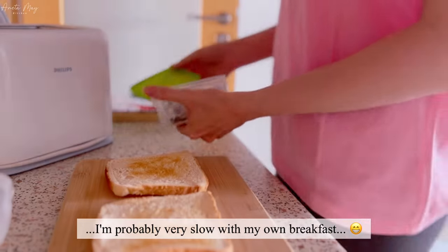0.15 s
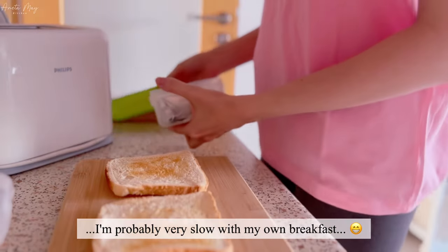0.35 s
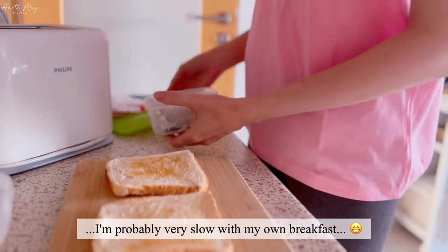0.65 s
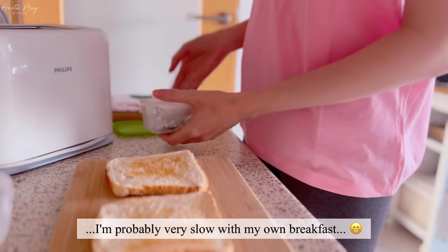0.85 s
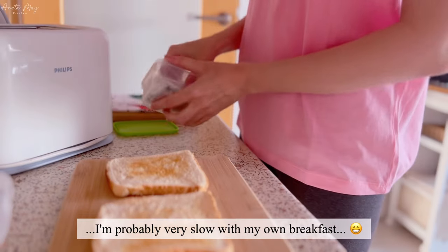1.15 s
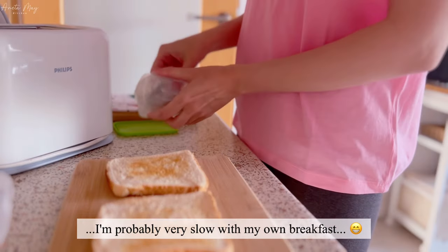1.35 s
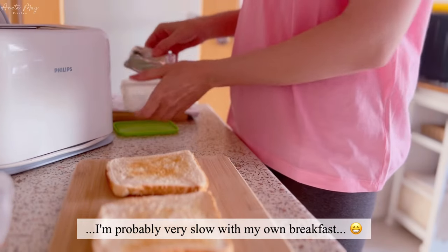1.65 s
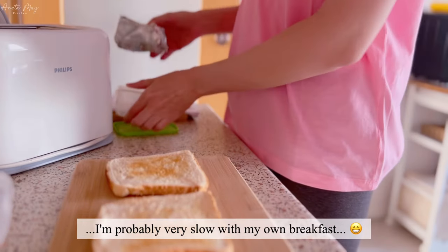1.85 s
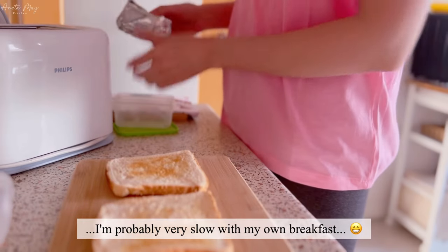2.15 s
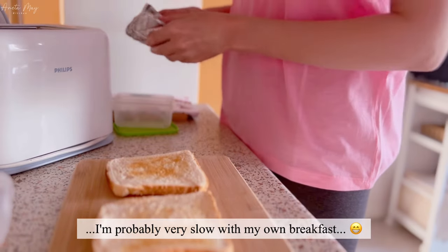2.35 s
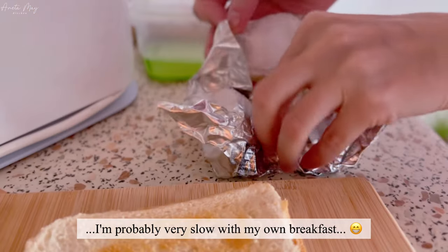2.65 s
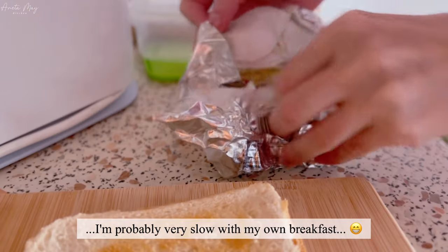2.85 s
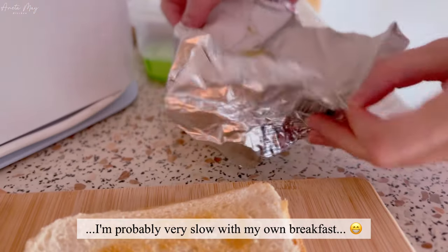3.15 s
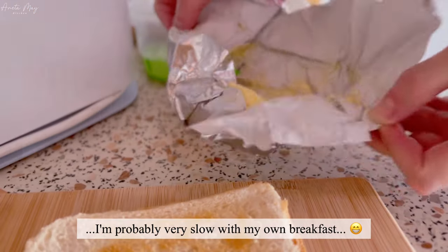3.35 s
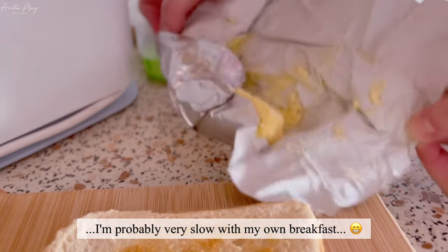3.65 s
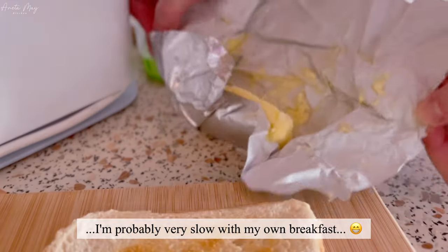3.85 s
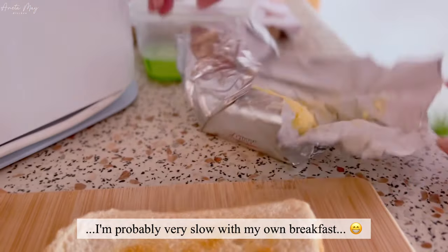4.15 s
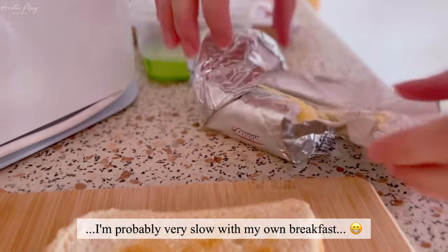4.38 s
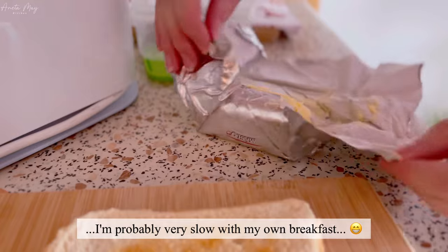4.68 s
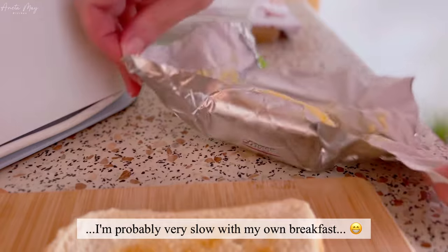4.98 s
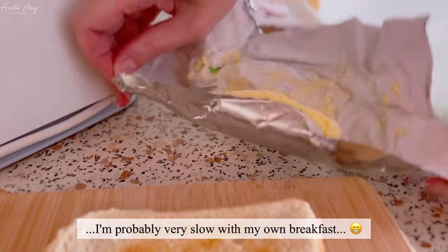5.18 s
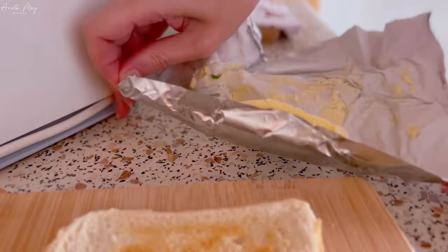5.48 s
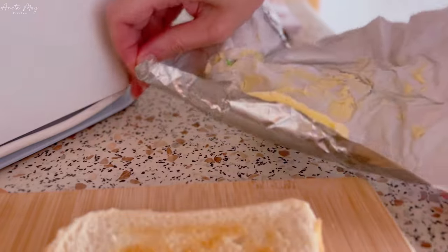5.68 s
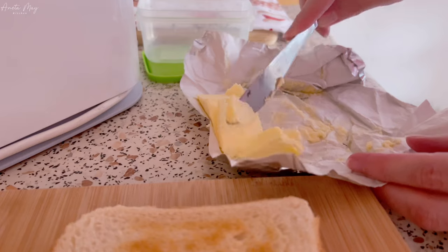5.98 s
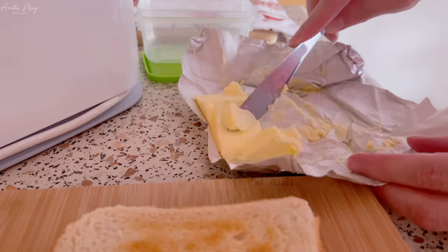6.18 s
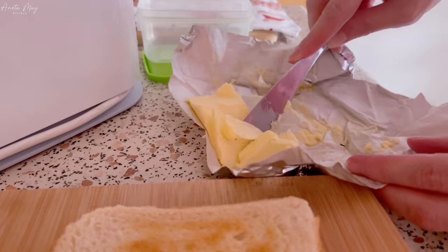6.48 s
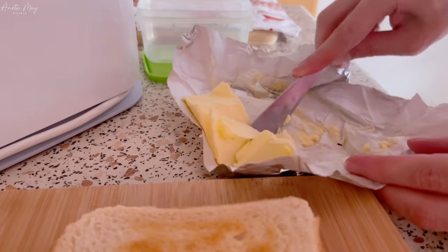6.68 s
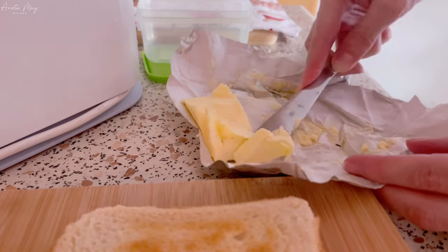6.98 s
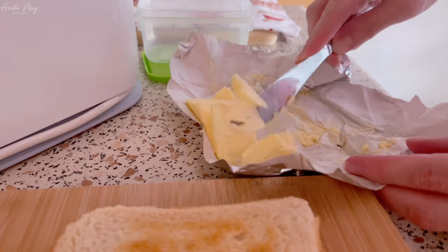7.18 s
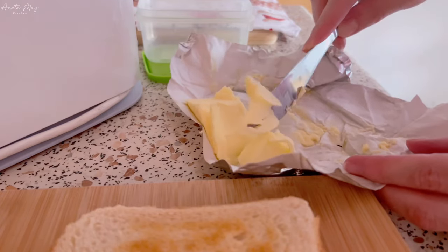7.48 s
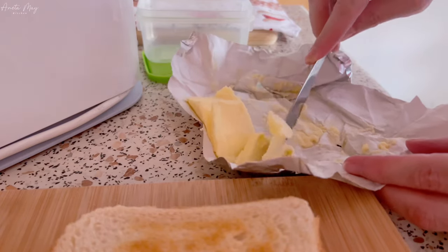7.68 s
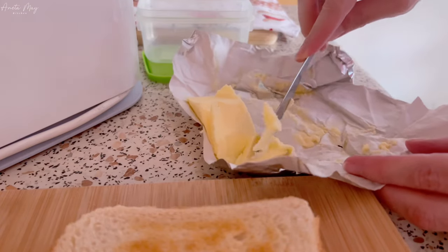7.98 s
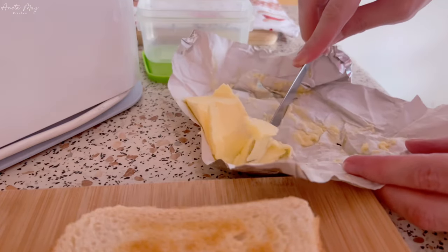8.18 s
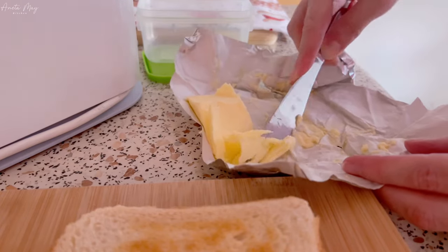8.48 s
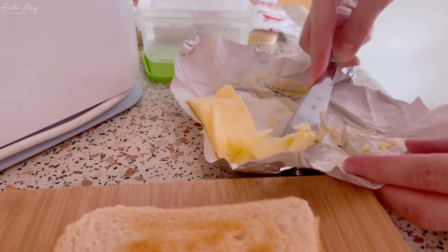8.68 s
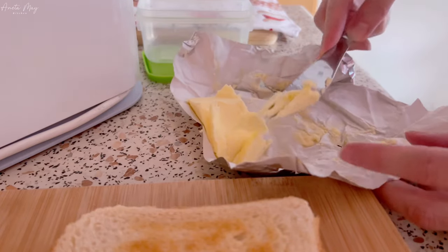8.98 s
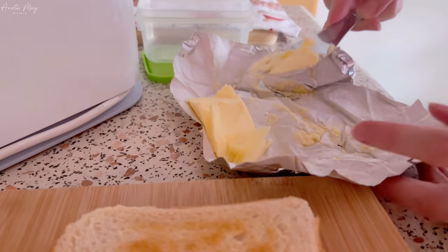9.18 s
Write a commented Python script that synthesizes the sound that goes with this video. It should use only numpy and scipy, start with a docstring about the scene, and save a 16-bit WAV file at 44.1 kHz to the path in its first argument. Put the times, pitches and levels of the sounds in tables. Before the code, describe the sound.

Close stereo microphones in a small, hard kitchen. A thin plastic container and its lid knock in a few hollow clacks, loudest near two seconds. Then foil butter wrapping is peeled open with bright snaps and dense crinkle, strongest just after three seconds. It thins to small crackles and faint rustles as a knife nudges the butter, with soft counter bumps and a faint steady hush beneath.

```python
"""A plastic tub and its lid knock on a stone counter in a quiet kitchen, over a faint steady hush.
Then a foil butter wrapper is peeled open with sharp snaps and rustle, and a knife works the butter.
Knocks are struck plastic resonances, snaps are noise bursts ringing at a crease pitch, rustle is
thousands of tiny clicks; soft bumps and low rumble come from the counter. Random echoes make a small
hard room, and a pair of microphone ports listens from close by."""
import sys
import numpy as np
from scipy import signal
from scipy.fft import rfft, irfft, next_fast_len
from scipy.io import wavfile
from scipy.ndimage import uniform_filter1d

SR = 44100
rng = np.random.default_rng(int(sys.argv[2]) if len(sys.argv) > 2 else 0)


def master(y):
    """Save y as 16-bit WAV."""
    cut = np.clip(np.atleast_2d(y).T, -1, 1)
    pcm = np.round(cut * 32767)  # scale
    wavfile.write(sys.argv[1], SR, pcm.astype(np.int16))


N = 411453

# The quiet kitchen's noise colour: pitch_hz, level_db (per Hz, relative)
HUSH_COLOUR = [(18, -21.5), (30, 6), (72, 4.5), (280, -10.5), (680, -21), (1270, -13.5), (1900, -20),
               (2400, -23.5), (8000, -30.5), (12000, -37), (16500, -49.5)]
# How alike the hush is at both ports: pitch_hz, likeness (0 to 1)
HUSH_LIKENESS = [(100, 0.92), (600, 0.27), (3000, 0.084)]
HUSH_DB = -69

# Shoves that set the counter rumbling: peak_s, level_db
SHOVES = [(0.0, -59), (0.17, -65), (0.47, -61), (0.83, -52), (1.87, -55.5), (2.0, -45.5), (2.08, -50),
          (2.49, -53.5), (2.96, -62.5), (3.3, -46), (3.57, -40.5), (3.709, -44.5), (3.998, -42.5),
          (4.24, -57), (4.5, -53), (4.62, -60.5), (4.86, -55.5), (5.3, -65.5), (5.6, -66.5), (5.76, -55.5),
          (5.93, -53.5), (6.2, -70), (6.7, -57.5), (6.86, -57), (7.12, -49.5), (7.6, -70), (7.799, -57),
          (8.47, -60), (8.65, -68.5), (9.25, -68)]
# Colour of that rumble: pitch_hz, level_db (per Hz, relative)
RUMBLE_COLOUR = [(20, -41.5), (45, 8.5), (90, 6.5), (160, 5), (260, -8), (450, -45.5)]
SHOVE_RISE_DB_PER_S, SHOVE_FALL_DB_PER_S = 301, 134

# Lid and tub knocks: start_s, blow_db, edge_tick_db (over the blow), pitch_hz, left_over_right_db
KNOCKS = [(0.004, -40, -30, 546, 0), (0.071, -53, -13, 1080, 0), (0.189, -49, -8.5, 848, 5.5),
          (0.235, -53, -21, 1250, -1), (0.464, -28.5, 3.5, 1200, 7), (0.507, -30.5, -11, 1236, 0.5),
          (0.809, -23.5, -2, 1090, -2), (0.815, -26, 1, 1130, 15), (0.853, -28.5, -15, 1180, -5),
          (0.868, -38.5, 4.5, 569, 23.5), (0.884, -32, -24, 1325, -8), (1.128, -42, -31, 1060, -0.5),
          (1.165, -42.5, -31, 625, 1), (1.197, -46, -30, 641, 1), (1.219, -41.5, -35, 1030, -2),
          (1.241, -42, -20, 1090, 1.5), (1.335, -43, -14, 1200, -1), (1.359, -39.5, -23, 1200, 0),
          (1.377, -41.5, -3, 1060, 10), (1.391, -40, -8, 1030, 2.0), (1.444, -54.5, 5.5, 960, 5.5),
          (1.47, -48.5, -20, 939, 0), (1.597, -39.5, 2.5, 890, 3), (1.855, -18.5, -6.5, 1390, 3.5),
          (1.883, -24, -12, 890, 9), (1.996, -17.5, -8, 1010, 8), (2.022, -43, -27, 1026, -6),
          (2.055, -17, -15.5, 1080, 8), (2.119, -28.5, -86, 1170, 2.5)]
# What the plastic rings with: pitch_hz, level_db, t60_s (time to fade by 60 dB)
PLASTIC_MODES = [(480, -14, 0.01), (610, 12.5, .03), (620, 3, 0.011), (794, 13.5, .03), (854.6, 2.5, 0.17),
                 (971, 10, 0.041), (1080, 9.5, 0.024), (1183, 2.5, .06), (1328, 2, 0.032),
                 (1490, -11, 0.038), (1650, -19.5, 0.015), (1930, -12.5, 0.019), (2750, -10, 0.07)]

# Strokes of fingers and knife over plastic and foil: peak_s, swell_s, fade_s, rustle_db,
# fold_pitch_hz, sizzle_db (over the rustle), body_db (over the rustle)
STROKES = [(0.004, .01, 0.075, -67.5, 1037, -10, 19), (0.23, 0.45, 0.045, -73.5, 1320, -10, 3.5),
           (0.796, 0.0045, .005, -75, 2000, -24, -24), (0.879, 0.085, 0.14, -49, 1590, -19, -4.5),
           (1.332, 0.071, 0.073, -56, 1244, -6.5, -38), (1.4, 0.068, 0.017, -57.5, 1147, 7.5, -36),
           (1.603, 0.036, 0.088, -56.5, 2110, -7, -2.5), (2.33, 0.073, .1, -59.5, 1768, -3.5, -2.5),
           (2.464, 0.026, 0.081, -56.5, 1672, -2, 4), (2.67, 0.064, 0.027, -51.5, 1594, -7, -18),
           (2.8, 0.17, 0.23, -55.5, 1298, -7.5, 1.5), (3.212, 0.069, 0.12, -50.5, 2400, -38, -5),
           (3.288, 0.086, 0.013, -50, 2263, -15.5, -2), (3.527, 0.12, 0.054, -52.5, 1937, 0, -0.5),
           (3.61, 0.011, 0.032, -47.5, 2014, 5.5, 1), (3.72, 0.09, 0.12, -53.5, 2180, -2, 1),
           (3.958, 0.075, .04, -59.5, 1932, -3.5, -6), (4.061, 0.013, 0.033, -59, 1688, 1, -2),
           (4.542, 0.038, 0.1, -57.5, 1580, 0.5, -0.5), (4.701, 0.0067, 0.17, -64.5, 1872, -3, -2.5),
           (4.91, 0.09, 0.37, -67, 2130, -16, 3), (5.07, 0.14, 0.16, -67.5, 1440, -2.5, -2),
           (5.382, 0.034, 0.14, -63.5, 1850, -46, 10), (5.58, 0.048, 0.089, -62.5, 2050, -27.5, 3),
           (5.689, 0.021, 0.023, -67.5, 1480, -5, -11), (5.799, 0.022, 0.054, -68, 2100, 8, 4.5),
           (5.859, 0.03, 0.05, -54, 2025, -4, -4), (5.94, 0.028, 0.09, -68.5, 1913, -10, 7),
           (6.325, 0.016, 0.12, -69.5, 1510, -7.5, 0.5), (6.692, 0.11, 0.092, -58, 1670, -10.5, -4.5),
           (6.854, 0.014, 0.066, -45, 1782, -7.5, -1.5), (6.894, 0.017, 0.013, -52.5, 1830, -9.5, -2),
           (7.028, 0.032, 0.22, -54.5, 1910, -9, -4), (7.201, 0.022, 0.027, -65, 1902, -13, 0),
           (7.601, 0.019, .06, -65, 1543, -6.5, 0), (7.717, 0.016, 0.072, -66.5, 2182, -10, -2),
           (7.922, 0.053, 0.042, -64.5, 1733, -5.5, -8.5), (8.375, .004, 0.038, -62, 2200, -2.5, -2),
           (8.402, .01, .01, -55.5, 1990, -5, -3), (8.44, 0.0084, 0.016, -55, 1901, -7.5, -4),
           (8.522, 0.047, 0.028, -49.5, 1870, -11, -7.5), (8.642, 0.096, 0.051, -61.5, 1560, -6, -2.5),
           (8.78, .005, 0.14, -79, 1600, -8.5, -9.5), (8.959, .005, 0.057, -73.5, 1990, -2.5, -5),
           (9.043, .005, .04, -69.5, 2100, -4.5, -5)]
STROKE_HOLD_S = 0.015  # flat top on either side of the peak
STROKE_DEPTH_DB = 18  # drop from the flat top, one swell before it and one fade after it
# Colours of large folds, small folds and the finest crinkles: pitch_hz, level_db (per Hz, relative)
BODY_COLOUR = [(250, -3.5), (400, 0.5), (700, 3), (1100, 3), (1600, -14), (3000, -60.5)]
CRACK_COLOUR = [(600, -20), (1200, -13), (2200, 3.5), (3500, 1), (5500, -2), (8000, -34.5)]
SIZZLE_COLOUR = [(4000, -45), (6000, 6), (8000, 2), (11000, -4), (13500, -7), (15700, -1.5), (16400, -20)]
OVERTONE, OVERTONE_SHARE = 1.55, 0.42  # second ring of a crease: pitch ratio and strength

# The butter block and the hands bump the counter: start_s, level_db, pitch_hz, t60_s
BUMPS = [(0.463, -31, 638, 0.051), (0.81, -33.5, 627, 0.08), (1.851, -36.5, 151, 0.21),
         (1.994, -26.5, 640, 0.047), (2.056, -29, 520, 0.027), (2.363, -46, 532, 0.052),
         (2.476, -39, 71, 0.085), (3.278, -34.5, 565, 0.081), (3.56, -47, 86, 0.12),
         (3.683, -29.5, 84, 0.17), (3.991, -28.5, 117, 0.11), (4.046, -53, 80.7, 0.076),
         (4.167, -46.5, 154, 0.16), (4.496, -44, 318, 0.1), (4.602, -45.5, 353, 0.084),
         (4.833, -50, 138, 0.13), (5.743, -49.5, 99, 0.12), (5.808, -51, 65.2, 0.048),
         (5.9, -45.5, 163, 0.17), (6.087, -55, 93, 0.11), (6.688, -46, 338, 0.12),
         (6.835, -35.5, 607, 0.11), (7.004, -42.5, 273, 0.1), (7.107, -31.5, 351, 0.056),
         (7.6, -56.5, 300, 0.17), (7.788, -44, 265, 0.099), (8.266, -50.5, 380, 0.11),
         (9.158, -57, 328, 0.13)]
# Colour of the muffled contact: pitch_hz, level_db (per Hz, relative)
PUFF_COLOUR = [(60, -28.5), (150, -17.5), (300, 3), (600, 0), (1000, -6), (2000, -40.5)]

# Foil creases snapping: start_s, crack_db, crease_pitch_hz, sizzle_db (over the crack),
# body_db (over the crack), left_over_right_db
SNAPS = [(2.3036, -44.5, 1430, -5, -5, -2), (2.3156, -42.5, 2330, 0, -4.5, 4),
         (2.328, -51, 1830, 17, -6, 0), (2.4299, -41, 1500, -4, -9, -4),
         (2.4729, -29.5, 2380, -3.5, -25, -0.5), (2.5234, -40.5, 1160, 0, 3.5, -2),
         (2.616, -44, 1430, -10, -26, -8), (2.6814, -40, 1610, -11, -27, -9),
         (2.7557, -38, 1190, -13, -16, -6), (2.7746, -42, 1160, -9, -23, -5),
         (2.958, -45.5, 1520, -16, 1, -3), (2.9826, -40, 1690, -6, 3, -0.5),
         (3.036, -36.5, 2280, -8, -5.5, 2), (3.0697, -38.5, 2000, -5.5, -10, 10),
         (3.0833, -34, 2420, -6, -6.5, 1.5), (3.0983, -35, 2310, -6, -26, 7),
         (3.1092, -38.5, 2400, -3, -11, -3), (3.142, -38.5, 2500, -13, -26, 13),
         (3.165, -38, 2430, -6, -36, -6), (3.176, -28.5, 2400, -3, -25, 1),
         (3.1808, -31.5, 2430, -6, -28, 1), (3.1936, -30.5, 2080, -8, -30, 6),
         (3.2015, -29, 2760, -5, -14, -3), (3.2111, -28, 2460, 4, -20, 2), (3.2426, -14, 2270, 5, -18, 2),
         (3.2838, -20.5, 2705, -5.5, -11, -4), (3.2893, -22, 2230, 1.5, 2, 6.5),
         (3.429, -39.5, 4110, 4, -3.5, 8), (3.447, -24, 4000, 8, -14, 1), (3.499, -37, 1430, 2, -22, -1),
         (3.5136, -41.5, 1400, 16, -9, 15), (3.5531, -27, 4110, 10, -7.5, 2),
         (3.579, -45, 2000, -14, -22, 5), (3.5896, -34.5, 1390, -7, -20, 0),
         (3.601, -25.5, 2280, 2, -20, 1), (3.6195, -28, 1720, 2, 3, -2), (3.6676, -20.5, 2300, 4, -15, 9),
         (3.7232, -35, 2030, 2.5, -28, 15), (3.7474, -35.5, 2280, -18, -12, 2),
         (3.7713, -34.5, 2340, -31, -13, 2.0), (3.8899, -47.5, 1730, -23, -18, -1),
         (3.9904, -36.5, 1240, -12.5, 4.5, 2.0), (4.179, -26.5, 1740, -6.5, -6, -5),
         (4.1962, -26.5, 1290, -2.5, -3, 0.5), (4.2118, -29.5, 2030, -12, -20, -1),
         (4.4682, -48, 1210, -13.5, 1.5, 3), (4.5223, -33, 2086, -6, -23, 3),
         (4.5469, -36, 1720, -24, -4, 3.0), (4.605, -43, 1420, 7, 1, 3.5), (4.6845, -39, 1790, -1, -27, -1),
         (4.6979, -39.5, 2180, -27, -13, 5), (4.7306, -49, 2010, -16, -17, 8),
         (4.801, -37.5, 2380, -25, -24, 4), (4.8273, -38, 2100, -7, -8, 3),
         (4.8385, -26, 1890, -4.5, -9, 1.5), (4.8603, -36.5, 1980, -9, -9, 1.5),
         (4.8916, -33.5, 2470, -10.5, -9, -2), (5.0873, -46.5, 1230, -20, 2, 6),
         (5.1384, -50, 1210, -21, 0, -1), (5.1823, -36, 1800, -48, -34, -0.5),
         (5.2362, -56.5, 2136, -29.5, 9, 6.5), (5.3366, -49, 1960, -40, -1.5, -0.5),
         (5.3604, -45.5, 2050, -35.5, 1, 0), (5.3717, -38.5, 1530, -33, -10.5, 3.0),
         (5.3839, -30.5, 2030, -48, -31, 1.0), (5.3994, -32.5, 2080, -33, -17, 0),
         (5.4323, -40, 1270, -11, -23, 11), (5.449, -40.5, 1250, -9, -4, 11),
         (5.4668, -40, 1240, -8.5, -4, 6), (5.5314, -47.5, 1960, -37, -8, 8),
         (5.5474, -49.5, 2060, -41, 5, 5), (5.5653, -49, 2020, -30, -7, 4),
         (5.5834, -57.5, 2020, -26, -19.5, -4), (5.599, -47, 2040, -25, -17, -1),
         (5.6147, -45.5, 2080, -23, -5, 2), (5.8317, -28.5, 1700, -4.5, -6.5, -2),
         (5.8496, -31.5, 1740, 2.5, -12.5, -4), (5.9492, -42.5, 1353, -6, -6, 0.5),
         (6.3143, -50.5, 1700, -12.5, -15.5, 3.5), (6.6858, -37.5, 1696, -9, -29, 0.5),
         (6.8388, -36.5, 1670, -3, -4, -1), (6.9915, -53, 1250, -26, -7, 5.0),
         (7.0085, -32.5, 1500, -2.5, -6, 9), (7.027, -40, 1480, -23, -17, 1.0),
         (7.0812, -49, 1370, -3, -3, -6), (7.108, -23.5, 1160, -9, -3, 5),
         (7.1912, -37.5, 1240, -6, -1, 0.5), (7.203, -36, 1380, -2.5, -3.5, 1.5),
         (7.4005, -46.5, 3550, -5, -9.5, 1), (7.4213, -49, 1465, -32, -11.5, -1),
         (7.5725, -43, 1602, -5.5, -13.5, 0.5), (7.6082, -42, 1480, -11, -6.5, -3.5),
         (7.7113, -45.5, 1400, -3, -7, 2), (7.729, -46, 3200, -18, -8, 1),
         (7.7992, -26.5, 3650, -4.5, -8, -3), (7.9073, -52.5, 1590, -17, -28, -3),
         (7.9242, -56, 1550, -17.5, -19.5, 5.5), (8.3562, -48, 1410, -7, -1, -1.0),
         (8.5329, -39, 1790, -26, -3.5, 1), (8.6441, -45, 1540, -25.5, -28, -2),
         (8.764, -55.5, 1790, -1.5, -13.5, -2), (8.944, -52.5, 2150, -21.5, -16.5, 0.5),
         (9.0296, -53.5, 1900, -17, -22, -1.5), (9.0454, -58, 1900, -15, -18, -4)]
BURST_MS = 1.43  # time scale of a snap

# How long the room rings: pitch_hz, t60_s
ROOM_FADE = [(200, .36), (530, .3), (1400, .28), (3700, .33), (7000, .29), (13000, .21)]
# How alike the echoes are at both ports: pitch_hz, likeness (0 to 1)
ECHO_LIKENESS = [(60, 0.33), (300, 0.65), (1000, 0.13), (4000, 0.14), (7000, 0.17), (15000, 1)]

# Phase lead of the left port; the treble reaches the right first: pitch_hz, left_lead_radians
LEFT_LEAD = [(0, 0), (1000, .6), (3000, 1.1), (5200, 0), (7150, -5.6), (9650, -3 * np.pi),
             (17250, -7 * np.pi)]
# Level of the right port against the left: pitch_hz, level_db
RIGHT_SHADE = [(300, -0.57), (4000, -1.1)]
EDGE_HZ = 16800  # upper band limit


def gain_of(db):
    """Turns decibels into a gain."""
    return 10 ** (np.asarray(db) / 20)


def evened(x):
    """Scales to an average (rms) strength of 1."""
    return x / np.sqrt(np.mean(x ** 2) + 1e-20)


def peaked(x):
    """Scales to a peak of 1."""
    return x / abs(x).max()


def read(points, hz):
    """Reads a table of pitches and values, in between its points on a log pitch axis."""
    f, value = np.transpose(points)
    return np.interp(np.log(hz + 1), np.log(f + 1), value)


def colour(x, points):
    """Filters by a table of pitches and dB, without any sound ahead of time (minimum phase)."""
    log_gain = np.log(gain_of(read(points, abs(np.fft.fftfreq(4096, 1 / SR)))))
    spectrum = np.exp(log_gain - 1j * signal.hilbert(log_gain).imag)
    taps = np.fft.ifft(spectrum).real[:2048]
    return signal.oaconvolve(x, taps)[:len(x)]


def add(mix, s, sound, pan_db):
    """Adds a sound to both channels at time s; a positive pan_db favours the left."""
    part = mix[:, max(round(s * SR), 0):][:, :len(sound)]
    part += gain_of([[pan_db / 2], [-pan_db / 2]]) * sound[:part.shape[1]]


def resonate(x, hz, width):
    """Shifts the curve hz down to zero, smooths, and shifts back: a moving resonance."""
    turn = np.exp(2j * np.pi * np.cumsum(hz) / SR)
    r = np.exp(-np.pi * width / SR)
    smooth = signal.lfilter([1 - r], [1, -r], x / turn + 1e-18)
    return 2 * (turn * smooth).real


def hill(t, rise_db_per_s, fall_db_per_s):
    """Gain that climbs steadily in dB to 1 at t = 0 and sinks again."""
    return gain_of(np.where(t < 0, rise_db_per_s * t, -fall_db_per_s * t))


def kitchen_hush():
    """Steady air and appliance noise, alike at both ports mostly in the bass."""
    hz = np.fft.rfftfreq(N, 1 / SR)
    a, b = rfft(rng.standard_normal((2, N)))
    same = np.clip(read(HUSH_LIKENESS, hz), 0, 1)
    right = same * a + np.sqrt(1 - same ** 2) * b
    spectra = np.array([a, right]) * gain_of(read(HUSH_COLOUR, hz))
    return gain_of(HUSH_DB) * evened(irfft(spectra, N))


def counter_rumble():
    """Lumpy low rumble, set off by shoves, that the counter carries to both ports."""
    t = np.arange(0, N, 64) / SR  # a coarse time grid is enough for the level
    level = sum(gain_of(db) * hill(t - s, SHOVE_RISE_DB_PER_S, SHOVE_FALL_DB_PER_S) for s, db in SHOVES)
    a, b = (evened(colour(rng.standard_normal(N), RUMBLE_COLOUR)) for _ in range(2))
    pair = np.array([1.1 * a + .12 * b, .9 * a - .12 * b])
    return np.interp(np.arange(N) / SR, t, level) * pair


def tub_knocks():
    """Each blow shakes the plastic for a few ms; the modes near its pitch ring out, its edge ticks."""
    out, t = np.zeros((2, N)), np.arange(4000) / SR
    hz, db, t60 = np.array(PLASTIC_MODES).T[:, :, None]
    for s, blow_db, tick_db, spot_hz, pan_db in KNOCKS:
        spot_db = -6.0 * abs(np.log2(hz / spot_hz))  # where it is struck favours some modes
        modes = gain_of(db + spot_db - 60 * t / t60) * np.sin(2 * np.pi * hz * t)
        radiated = np.gradient(modes.sum(0))  # thin walls radiate little bass
        noise = rng.standard_normal((2, len(t)))
        shake = noise[0] * t * np.exp(-t / 0.0027)
        blow = signal.oaconvolve(shake, radiated)[:len(t)]
        tick = noise[1] * np.exp(-t / 0.0076) * (1 - np.exp(-t / 0.00063))
        knock = peaked(blow) + gain_of(tick_db) * peaked(colour(tick, CRACK_COLOUR))
        add(out, s, gain_of(blow_db) * knock, pan_db)
        add(out, s, gain_of(blow_db + tick_db) * peaked(colour(tick, SIZZLE_COLOUR)), -1.1)
    return out


def rustle(per_s=3000, spread_db=2.0):
    """Many tiny creases of unequal size, in three sizes of fold; the fold in hand rings at its own pitch."""
    size = gain_of(spread_db * np.minimum(rng.exponential(1, N), 5))
    size = size * (rng.random(N) < per_s / SR)  # keep per_s creases a second on average
    clumps = evened(uniform_filter1d(uniform_filter1d(rng.standard_normal(N), 300), 300))
    grains = size * rng.choice([-1., 1.], N) * gain_of(2.5 * clumps)
    side = rng.uniform(-1.1, 1, N)  # some creases lie nearer each port
    pair = [evened(grains * (1 + k * side)) for k in (1, -1)]
    folds = np.array([[evened(colour(g, points)) for g in pair] for points in (CRACK_COLOUR, BODY_COLOUR)])
    fizz = evened(colour(grains, SIZZLE_COLOUR)) * gain_of([[-1.6], [1.6]])

    peak_s, pitch_hz = np.transpose(STROKES)[[0, 4]]
    hz = np.interp(np.arange(N) / SR, peak_s, pitch_hz)  # the pitch glides from stroke to stroke
    ring = []
    for g in pair:
        main = evened(resonate(resonate(g, hz, 700), hz, 700))
        overtone = evened(resonate(g, OVERTONE * hz, 900))
        ring.append(main + OVERTONE_SHARE * overtone)
    ring = np.array(ring)

    out = np.zeros((2, N))
    for s, swell, fade, db, _, sizzle_db, body_db in STROKES:
        swell, fade = max(swell, .005), max(fade, .005)
        first = max(round((s - STROKE_HOLD_S - 3 * swell) * SR), 0)
        last = min(round((s + STROKE_HOLD_S + 3 * fade) * SR), N)
        at = np.arange(first, last)
        from_peak = at / SR - s
        past = from_peak - np.clip(from_peak, -STROKE_HOLD_S, STROKE_HOLD_S)  # zero on the flat top
        broad = gain_of(.5 * np.minimum(sizzle_db, 0))  # a dull stroke is mostly ring
        (crack, body), sizzle = folds[:, :, at], fizz[:, at]
        fold = (ring[:, at] + broad * crack) / np.sqrt(1 + broad ** 2)
        sound = fold + gain_of(sizzle_db) * sizzle + gain_of(body_db) * body
        out[:, at] += gain_of(db) * sound * hill(past, STROKE_DEPTH_DB / swell, STROKE_DEPTH_DB / fade)
    return out * gain_of([[1.2], [-1.2]])


def room_echo(x, gap_ms=3.3):
    """Sparse echoes of random sign, each band dying at its own speed; three tails take turns."""
    out, start = np.zeros((2, N)), round(gap_ms * SR / 1000)
    turn = np.arange(N) / SR * 150  # quick turns: even one click reaches all three
    for k in range(3):
        taps = np.zeros((2, SR // 2))
        at = np.arange(start, SR // 2 - 20, 20)
        at = at + rng.integers(0, 20, (2, len(at)))  # one echo somewhere in every 20 samples
        np.put_along_axis(taps, at, rng.choice([-1., 1.], at.shape), 1)
        hz, t, z = signal.stft(taps, SR, nperseg=256)
        same = np.clip(read(ECHO_LIKENESS, hz), 0, 1)[:, None]
        z[1] = same * z[0] + np.sqrt(1 - same ** 2) * z[1]
        fading = gain_of(-60 * t / read(ROOM_FADE, hz)[:, None])
        tail = signal.istft(z * fading, SR, nperseg=256)[1]
        tail = tail / np.linalg.norm(tail[0])
        window = np.sqrt(2 / 3) * np.cos(turn + k * np.pi / 3)  # squares sum to 1
        out += signal.fftconvolve((x * window)[None], tail, axes=1)[:, :N]
    return out


def counter_bumps():
    """Soft blows: a dull low ring under a short muffled puff."""
    out, t = np.zeros((2, N)), np.arange(8000) / SR
    for s, db, hz, t60 in BUMPS:
        fade = gain_of(-60 * t / max(t60, .02)) * (1 - np.exp(-t / 0.0071))
        turns = hz * (t + 0.0016 * (1 - np.exp(-t / 0.004)))  # the pitch sags as the contact spreads
        ring = np.sin(2 * np.pi * turns) + .5 * np.sin(2 * np.pi * 0.74 * turns)
        puff = evened(colour(rng.standard_normal(len(t)), PUFF_COLOUR)) * np.exp(-t / 0.012)
        add(out, s, gain_of(db) * peaked((ring + 1.2 * puff) * fade), 1.4)
    return out


def foil_snaps():
    """A crease buckles: a short burst that rings at the crease pitch, then a fainter shiver of the sheet."""
    out, t = np.zeros((2, N)), np.arange(2048) / SR
    click = np.eye(1, 2048)[0]
    crack, sizzle, body = (colour(click, points) for points in (CRACK_COLOUR, SIZZLE_COLOUR, BODY_COLOUR))
    u = 1000 * t / BURST_MS
    shape = np.sqrt(u) * np.exp(-2 * u) + .09 * np.exp(-t / .007)  # burst, then shiver
    for s, db, hz, sizzle_db, body_db, pan_db in SNAPS:
        burst = rng.standard_normal(len(t)) * shape
        tones = np.sin(2 * np.pi * hz * t) + OVERTONE_SHARE * np.sin(2 * np.pi * OVERTONE * hz * t)
        ring = tones * t * np.exp(-t * hz / .9)  # dies within a few cycles
        ring_share = min(1, (2600 / hz) ** 2)
        # a dull snap is mostly ring
        fold = ring_share * evened(ring) + gain_of(1.18 * sizzle_db) * evened(crack)
        sharp = burst * (2.3 + np.exp(-t / 0.0013))  # the finest crinkles go first
        parts = signal.fftconvolve([burst, sharp, burst], [fold, sizzle, body], axes=1)[:, :len(t)]
        snap = peaked(parts[0]) + gain_of(body_db) * peaked(parts[2])
        add(out, s, gain_of(db) * snap, pan_db)
        add(out, s, gain_of(db + sizzle_db) * peaked(parts[1]), -1.2)  # treble nearly even at both ports
    return out


def scene():
    """Mixes all sounds; the tub stands farther off than the foil, so more of it goes to the room."""
    plastic = tub_knocks()
    foil = foil_snaps() + rustle()
    to_room = gain_of(-2.5) * plastic + gain_of(-11.5) * foil
    echo = room_echo(to_room.mean(0))
    return plastic + foil + echo + counter_bumps() + counter_rumble() + kitchen_hush()


def record(dry):
    """The spacing of the ports turns the phase between them; then the band limit."""
    size = next_fast_len(N + 4096)
    z, hz = rfft(dry, size), np.fft.rfftfreq(size, 1 / SR)
    z *= hz ** 2 / (hz ** 2 + 33.0 ** 2)  # the ports roll off the deepest bass
    phase = np.interp(hz, *np.transpose(LEFT_LEAD))
    z[1] *= gain_of(read(RIGHT_SHADE, hz)) * np.exp(-1j * phase)
    ports = irfft(z, size)[:, :N]
    band_limit = signal.firwin(511, EDGE_HZ, window=("kaiser", 9), fs=SR)
    return signal.oaconvolve(ports, band_limit[None], "same")


dry = scene()
out = record(dry)
master(out)
```